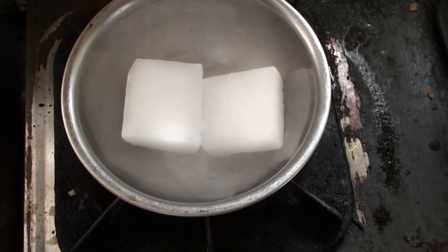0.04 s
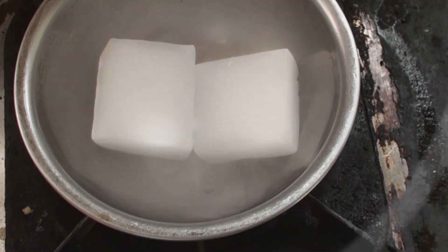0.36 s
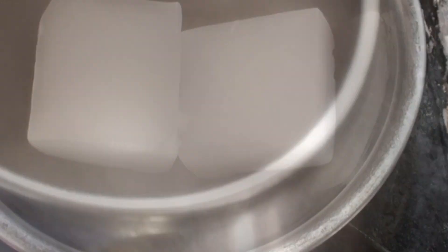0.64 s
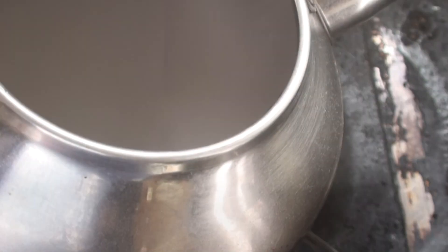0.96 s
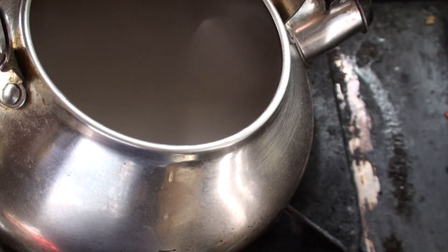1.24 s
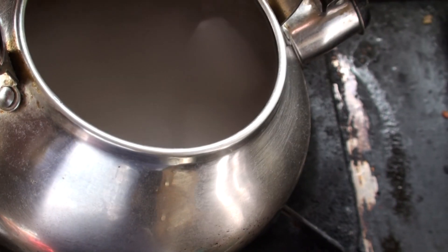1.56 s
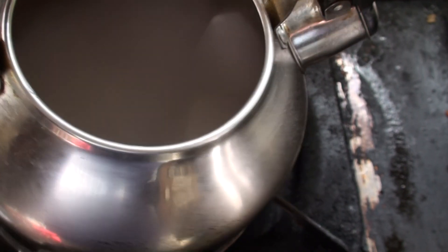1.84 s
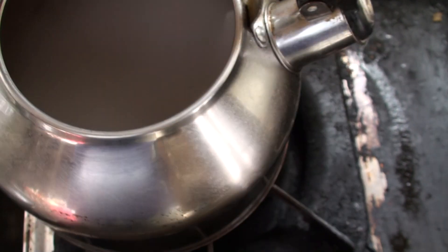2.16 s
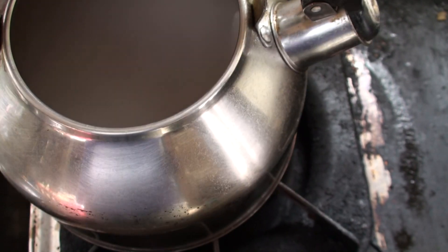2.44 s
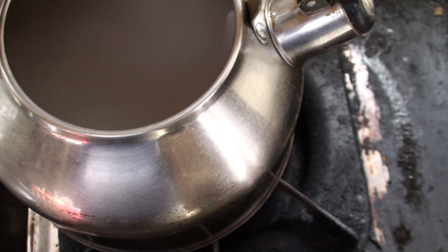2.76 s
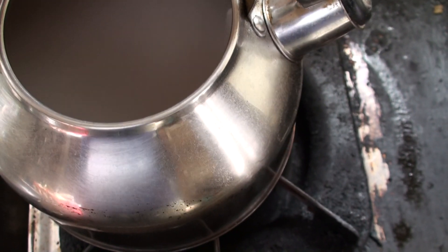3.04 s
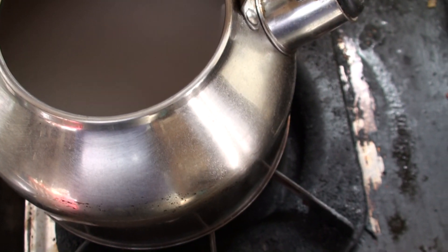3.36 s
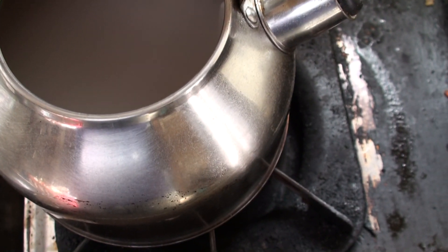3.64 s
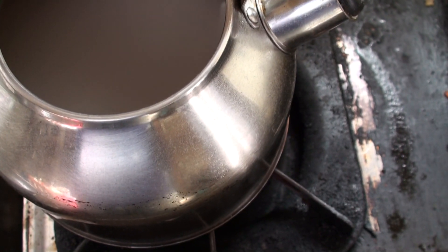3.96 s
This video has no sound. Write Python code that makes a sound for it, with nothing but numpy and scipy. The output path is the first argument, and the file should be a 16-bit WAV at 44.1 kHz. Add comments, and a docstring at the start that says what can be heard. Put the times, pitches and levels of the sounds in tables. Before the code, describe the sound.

Dry ice rattles loudly in a steel kettle, after briefly hissing and squeaking in a pan. The fast ringing chatter locks into a buzz, stalls twice and returns looser and boomier. The microphone is close, in a small kitchen.

```python
"""Dry ice on steel

A small kitchen, microphone close, pan and kettle a little to the right. Blocks of dry ice hiss and
squeak in a steel pan; then dry ice rattles loudly in a steel kettle on the stove. Escaping gas bounces
the ice on the metal hundreds of times a second, and the kettle rings. The chatter locks briefly into
a pitched buzz, stalls twice and comes back looser, with more boom."""
import sys
import numpy as np
from scipy import signal
from scipy.fft import rfft, irfft
from scipy.io import wavfile
from scipy.ndimage import uniform_filter1d, minimum_filter1d

SR = 44100
rng = np.random.default_rng(int(sys.argv[2]) if len(sys.argv) > 2 else 0)


def wav_out(sig):
    """Save sig, one row per channel (or a flat mono array), as 16-bit PCM at SR to the path in sys.argv[1]."""
    wavfile.write(sys.argv[1], SR, np.round(np.clip(np.atleast_2d(sig).T, -1, 1) * 32767).astype(np.int16))


N = 176400
TIME = np.arange(N) / SR
HZ = np.maximum(np.arange(N // 2 + 1) * SR / N, 1)

# Room tone of the kitchen: frequency_hz, level_db
ROOM_TONE_SPECTRUM = [(25, -12), (60, -14), (90, -5), (130, -11), (200, 2), (1000, -10), (15000, -32)]
# Part of the steel's ring that differs between left and right: frequency_hz, relative_db
SCATTER = [(60, 6), (200, -9), (400, -9.5), (1500, -7), (4000, -3), (12000, -0.5)]
# Where the kettle sits at the microphone: frequency_hz, left_minus_right_db
KETTLE_BALANCE = [(60, -18), (99, -5), (160, -11.5), (270, -5), (450, -7.5), (740, -6.5), (1220, -2.5),
                  (2010, -4.5), (3330, -4.5), (5500, -7.5), (9080, -1), (15000, -4.5)]

# Gas escaping under the blocks in the pan, before HISS_TRIM_DB: time_s, middle_db, treble_db
HISS_LEVELS = [(0.0, -40, -46), (0.017, -37.5, -37.5), (0.054, -39, -44.5), (0.202, -38, -33),
               (0.238, -37.5, -40), (0.482, -36, -40), (0.508, -40, -43), (0.532, -43, -52),
               (0.562, -42.5, -61), (0.578, -39, -42), (0.6, -44, -56), (0.616, -38.5, -43.5),
               (0.68, -39, -43)]
# Tone colour of that gas: frequency_hz, level_db
HISS_SPECTRUM = [(40, -41), (130, -34), (190, -10), (370, -14.5), (450, -7.5), (620, -16), (950, -2),
                 (1150, -6.5), (1550, -5), (1850, -13.5), (2300, 3), (3300, -3), (4200, -4), (5200, -8),
                 (7500, -16.5), (9500, -11), (11800, -5.5), (15500, -17)]
# Ice squeaking on the pan: start_s, length_s, pitch_hz, tone_db, rasp_db, ring_db
SQUEAKS = [(0.084, 0.01, 4300, -32, -30.5, -31), (0.134, 0.024, 4260, -20, -25, -40),
           (0.16, 0.021, 4280, -29, -24, -50), (0.178, 0.02, 3195, -16, -27, -45),
           (0.184, 0.011, 3160, -29, -14, -41), (0.197, 0.026, 4240, -19, -20.5, -39),
           (0.31, 0.011, 4300, -24.5, -44, -30.5), (0.375, 0.011, 4260, -30, -46, -44),
           (0.425, 0.036, 4290, -28, -33.5, -43), (0.441, 0.0092, 4270, -27.5, -40.5, -26.5),
           (.631, 0.012, 8660, -33, -33, -40), (0.661, 0.013, 4310, -20, -33, -31)]
# Tone colour of the rasp in a squeak: frequency_hz, level_db
RASP_SPECTRUM = [(100, -45), (800, -48), (2000, -2), (3200, 6.5), (4200, -2.5), (5200, -6), (6600, 5.5),
                 (8000, -9), (11000, -10.5), (15500, -29)]

# The kettle's main modes: pitch_hz, width_hz, tight_drive_db, loose_drive_db
KETTLE_MODES = [(201, 14.4, -13, -4), (309.6, 25, 6.5, -4), (399.6, 22, -7.5, -12), (542, 38, -7, -6),
                (730, 14.8, 6, -1), (1107.3, 28.5, 2, -1), (1526, 34, 0, -10.5), (1613, 20, -1, -11),
                (1718, 30, -4, -14.5), (2142, 75, -5, -22), (2404, 8.7, 1.5, -32), (2768, 41, -4, -34),
                (3100, 26, -5, -15), (3148, 114, -10.5, -3.5), (3560, 45, -11, 0), (3690, 59, -12, -5),
                (3936, 22, -8.5, 4), (4186, 40, -4, -6), (5190, 69, -5.5, -3.5)]
# Dense wash of weaker wall modes under tight chatter: frequency_hz, level_db
TIGHT_WASH = [(30, -43), (85, -22.5), (130, -21), (200, -12), (330, 12.5), (450, -59), (650, -40),
              (830, -4.5), (1000, -2.5), (1600, 3), (2100, -0.5), (3100, -6.5), (4500, -13.5), (6000, -11),
              (8600, -7.5), (9500, -14.5), (11500, -12.5), (13500, -25), (15500, -40)]
# The wash under loose chatter and knocks: frequency_hz, level_db
LOOSE_WASH = [(30, -50), (85, -17), (130, -18), (200, -2.5), (330, 8.5), (450, -8), (650, -17), (850, 2),
              (1150, -6.5), (1900, -8.5), (2800, -5), (3500, 2.5), (4400, -13), (5500, -5), (7500, -17),
              (9000, -26.5), (11500, -34), (15500, -52)]
# Borders between the rattle's boom, clang, treble and top: frequency_hz
CROSSOVERS_HZ = [450, 2600, 7500]
# Course of the tight rattle: time_s, boom_db, clang_db, treble_db, top_db
TIGHT_LEVELS = [(0.66, -71, -41, -45, -37), (0.682, -50, -43, -45, -51), (0.691, -6.5, -18, -13, -23),
                (0.701, 1, -13, -11, -19), (0.715, -16, -17.5, -17, -24), (0.747, -18, -23, -25, -34),
                (0.77, -9, -16.5, -18.5, -26), (0.803, -14, -20.5, -21.5, -26.5),
                (0.83, -20.5, -18, -17.5, -24), (0.92, -16.5, -14, -22, -28.5),
                (0.97, -24, -15, -18.5, -26), (1.19, -19, -14.5, -16.5, -25),
                (1.23, -29.5, -14.5, -19, -25), (1.32, -13, -14.5, -19, -27),
                (1.36, -23, -18.5, -20, -26.5), (1.6, -22.5, -15, -20, -26.5),
                (1.69, -25.5, -13.5, -20, -26.5), (1.8, -23.5, -17.5, -21.5, -29),
                (1.87, -23.5, -13.5, -19.5, -24.5), (2.07, -23, -16.5, -22.5, -30),
                (2.09, -31, -17.5, -18.5, -23), (2.221, -26.5, -15.5, -20.5, -28),
                (2.238, -14.5, -19.5, -24, -37), (2.28, -34, -27.5, -36, -43),
                (2.35, -25.5, -21, -22, -34.5), (2.38, -24, -21.5, -31.5, -49),
                (2.48, -38, -17, -19.5, -26), (2.525, -34, -16.5, -18.5, -29.5),
                (2.553, -21, -18, -21, -29.5), (2.6, -38, -29, -44, -95), (2.64, -44, -34, -49, -73),
                (2.67, -42, -43, -64, -63)]
# Course of the loose rattle: time_s, boom_db, clang_db, treble_db, top_db
LOOSE_LEVELS = [(2.67, -64, -43, -65, -64), (2.684, -30, -44, -53, -84), (2.695, -30, -30, -28, -48),
                (2.714, -34, -36, -44, -64), (2.72, -26, -36, -34, -54), (2.736, -38, -33, -23.5, -37.5),
                (2.746, -20, -24, -23, -38), (2.771, -28, -23.5, -23.5, -33), (2.779, -20, -26.5, -30, -47),
                (2.814, -22.5, -28.5, -26, -46), (2.84, -32, -39.5, -45, -73), (2.884, -40, -53, -65, -78),
                (2.918, -28, -35, -49, -65), (2.924, -28, -36, -34, -70), (2.944, -23, -30.5, -40, -57),
                (2.96, -17, -28.5, -28, -44), (3.033, -15.5, -25, -29, -44), (3.042, -10.5, -32, -41, -58),
                (3.058, -24, -31, -31, -37), (3.08, -16.5, -21, -17.5, -30.5),
                (3.144, -24, -21, -22.5, -39), (3.192, -15, -20, -17, -27), (3.24, -23.5, -24, -24.5, -37),
                (3.258, -21.5, -23, -17, -32), (3.31, -24, -19, -19, -30), (3.35, -28, -34, -37, -51),
                (3.362, -19, -24, -20, -33.5), (3.436, -26.5, -21.5, -20.5, -32.5),
                (3.488, -14, -22.5, -16.5, -31.5), (3.528, -24, -23, -22.5, -39),
                (3.55, -16.5, -19.5, -11.5, -22.5), (3.57, -22, -21, -25, -36),
                (3.6, -19.5, -23, -17.5, -34), (3.774, -16, -21.5, -18, -31.5), (3.788, -14, -23, -24, -40),
                (3.818, -19, -23, -15.5, -28.5), (3.875, -25, -23.5, -20, -34),
                (3.94, -20, -19, -14, -27.5), (4.0, -15.5, -21.5, -19.5, -35)]
# Tight chatter falling in step with one mode: middle_s, length_s, pitch_hz, over_chatter_db
SWELLS = [(0.699, 0.051, 364, -6), (0.733, 0.077, 272.4, 0.5), (0.78, .05, 294, 0), (0.798, 0.035, 372, 0),
          (0.943, 0.068, 733, -6), (1.23, 0.087, 2205, -8.5), (1.672, 0.17, 1641, -4),
          (1.87, .11, 1668, -7)]
# Bounces locking into a buzz: time_s, over_chatter_db
BUZZ_LEVELS = [(1.8, -31), (1.92, -11), (2.09, -1.5), (2.18, -8), (2.24, -13), (2.34, -8.5), (2.41, -9),
               (2.44, 11.5), (2.51, 8), (2.545, -10), (2.66, 3)]
# Bounce rate in the buzz: time_s, pitch_hz
BUZZ_PITCH = [(1.9, 557), (2.03, 562), (2.07, 578), (2.2, 579), (2.4, 588), (2.47, 579), (2.51, 580),
              (2.55, 586)]
# Harmonics of the buzz: multiple, level_db
BUZZ_HARMONICS = [(1, 1.5), (2, 7), (3, -1), (4, -6.5), (5, -13), (6, -9.5), (7, -15.5), (9, -10),
                  (10, -19), (12, -14), (14, -25), (15, -14)]
# The kettle humming under loose ice: time_s, pitch_hz, over_chatter_db
HUM = [(2.67, 324, -9), (2.77, 312.2, -1.5), (2.87, 314.6, -15), (2.93, 322.6, -2), (3.01, 312.8, 5.5),
       (3.08, 310.8, -10), (3.19, 301.3, -5), (3.28, 307.4, -16.5), (3.41, 306.4, -12.5), (3.48, 311, -9),
       (3.57, 304.2, -16.5), (3.77, 311.2, -4.5), (3.88, 316, -15), (4.0, 319.6, -3)]
# Single hard knocks of a block on the kettle: start_s, level_db
KNOCKS = [(.683, -19), (2.686, -41), (2.767, -40), (2.901, -32), (3.061, -22), (3.356, -18.5), (3.551, -14)]

TIGHT_HITS_PER_S, LOOSE_HITS_PER_S, SPITS_PER_S = 450, 260, 680  # 1 / median gap, at each corner
TIMING_SPREAD, STRENGTH_SPREAD_DB = 0.55, 1.5
TIGHT_CLUMP_DB, LOOSE_CLUMP_DB, CLUMPS_PER_S = 2.5, 1, 54
CORNER_SHIFT_DB, MODE_SHIFT_DB, SHIFTS_PER_S = 3.5, 2.5, 17  # the load wanders among corners and modes
SPUTTER_DB, SPUTTERS_PER_S, SPUTTER_ABOVE_HZ = 2.5, 270, 4200
HISS_SPLIT_HZ, HISS_TRIM_DB = 2050, 5.5
SQUEAK_WAVER, SQUEAK_OCTAVE_DB, SQUEAK_EDGE_S = 0.016, -29, 0.0025
PAN_RING_HZ, PAN_TAIL_HZ, PAN_TAIL_DB, PAN_TAIL_T60_S = 5660, 4420, -15.5, 0.24
WALL_LOW_HZ, WALL_HIGH_HZ, WALL_WIDTH_HZ = 4253, 9980, 22
WALL_DB, WALL_SHIFT_DB, WALL_SHIFTS_PER_S = -5, 5, 43
BUZZ_JITTER, BUZZ_LOOSE_JITTER = 0.0038, 0.0049  # share of the pitch; extra while the chatter wins


def from_db(db):
    """Decibels to gain."""
    return 10 ** (np.asarray(db) / 20)


def rms_one(x):
    """Scale to unit rms."""
    return x / np.sqrt(np.mean(x ** 2) + 1e-20)


def in_time(rows):
    """Each column of a time table at every sample."""
    times, *columns = np.transpose(rows)
    return [np.interp(TIME, times, column) for column in columns]


def at_hz(points):
    """A spectrum table at every frequency."""
    hz, db = np.transpose(points)
    return np.interp(np.log(HZ), np.log(hz), db)


def colour(x, points):
    """Shape a sound by a spectrum table."""
    return irfft(rfft(x) * from_db(at_hz(points)), N)


def drift(rate_hz):
    """Random wander of unit rms, mostly slower than rate_hz."""
    return rms_one(irfft(rfft(rng.standard_normal(N)) / (1 + (HZ / rate_hz) ** 2), N))


def sides(db):
    """Left and right gains for a level difference; their mean is 1."""
    left = 2 / (1 + from_db(-np.atleast_1d(db)))
    return np.array([left, 2 - left])


def through(x, response):
    """Play a sound through an impulse response."""
    return signal.fftconvolve(np.atleast_2d(x), response[:, :SR // 2], axes=1)[:, :N]


def follow(x, levels, crossovers, even_s=0.033):
    """Even out each band, then give it its level curve; silent outside the curve."""
    out, rest = 0, rfft(x)
    size = int(even_s * SR)
    for hz, level_db in zip([*crossovers, SR], in_time(levels)):
        part = rest / (1 + (HZ / hz) ** 16)
        rest = rest - part
        band = irfft(part, N)
        power = uniform_filter1d(uniform_filter1d(band.mean(0) ** 2, size), size // 2)
        out = out + band / np.sqrt(np.abs(power) + 1e-18) * from_db(level_db)
    sounding = (TIME >= levels[0][0]) & (TIME <= levels[-1][0])
    return out * uniform_filter1d(1.0 * sounding, size=200)


def room_tone(level_db=-52):
    """The quiet of the kitchen: faint, steady, dull noise."""
    return from_db(level_db) * rms_one(colour(rng.standard_normal((2, N)), ROOM_TONE_SPECTRUM))


def kitchen_reverb(x, t60_s=0.21, level_db=-12.5):
    """Near walls return a short diffuse tail, different on each side of the microphone."""
    tail = rng.standard_normal((2, N)) * from_db(-60 * TIME / t60_s) * (TIME > .005)
    tail /= np.sqrt(np.sum(tail ** 2, axis=1, keepdims=True))
    return from_db(level_db) * through(x, tail)


def contacts(per_s, clump_db):
    """Ice tapping steel: unevenly timed clicks whose strength comes in clumps."""
    timing, strength = rng.standard_normal((16000, 2)).T
    at = (np.cumsum(np.exp(TIMING_SPREAD * timing)) / per_s * SR).astype(int)
    clicks = np.bincount(at[at < N], from_db(STRENGTH_SPREAD_DB * strength[at < N]), N)
    return (clicks - clicks.mean()) * from_db(clump_db * drift(CLUMPS_PER_S))


def wash(t60_s):
    """The dying ring of countless close modes, partly different left and right."""
    dying = rng.standard_normal((3, N)) * from_db(-60 * np.minimum(TIME / t60_s, 4))
    dying /= np.sqrt(np.sum(dying ** 2, axis=1, keepdims=True))
    return dying[0] + colour(dying[1:], SCATTER)


def corners(per_s, clump_db, spectrum, t60_s, count):
    """The ice touches at several corners, each with its own wash; returns the clicks and their wash."""
    trains = [contacts(per_s, clump_db) * from_db(CORNER_SHIFT_DB * drift(SHIFTS_PER_S))
              for _ in range(count)]
    ringing = sum(through(clicks, wash(t60_s)) for clicks in trains)
    return sum(trains), colour(ringing, spectrum)


def sputter(x):
    """Soft and hard contacts alternate at random, so the treble flares and dulls."""
    low = irfft(rfft(x) / (1 + (HZ / SPUTTER_ABOVE_HZ) ** 4), N)
    return low + (x - low) * from_db(SPUTTER_DB * drift(SPUTTERS_PER_S))


def pan_hiss():
    """Gas spits from under the blocks in a dense sizzle."""
    _, spits = corners(SPITS_PER_S, clump_db=5.2, spectrum=HISS_SPECTRUM, t60_s=0.038, count=4)
    return from_db(HISS_TRIM_DB) * follow(sputter(spits), HISS_LEVELS, [HISS_SPLIT_HZ])


def pan_squeaks():
    """Ice squeals on the pan with a rasp of fast contacts and a high ring; one mode sings on faintly."""
    scraping = through(contacts(per_s=1800, clump_db=3.5), wash(t60_s=0.011))
    rasp = rms_one(colour(scraping, RASP_SPECTRUM))
    phase_per_hz = 2 * np.pi * np.cumsum(1 + SQUEAK_WAVER * drift(315)) / SR
    ring = np.sin(2 * np.pi * PAN_RING_HZ * TIME)
    age = TIME[:SR // 2]
    tail = from_db(PAN_TAIL_DB - 60 * age / PAN_TAIL_T60_S) * np.sin(2 * np.pi * PAN_TAIL_HZ * age)
    out = np.zeros((2, N))
    for start_s, length_s, hz, tone_db, rasp_db, ring_db in SQUEAKS:
        inside_s = np.minimum(TIME - start_s, start_s + length_s - TIME)
        gate = np.clip(inside_s / SQUEAK_EDGE_S + .5, 0, 1)
        on = gate > 0
        phase = hz * phase_per_hz[on]
        tone = np.sin(phase) + from_db(SQUEAK_OCTAVE_DB) * np.sin(2 * phase)
        squeak = from_db(tone_db) * tone + from_db(rasp_db) * rasp[:, on] + from_db(ring_db) * ring[on]
        out[:, on] += gate[on] * squeak
        middle = int((start_s + length_s / 2) * SR)
        out[:, middle:middle + len(tail)] += from_db(tone_db) * tail
    return out


def thin_wall(x, groups=5, per_group=9):
    """Narrow high modes of the thin steel flare and fade in groups as the contacts move."""
    out, spectrum = x, rfft(x)
    modes_hz = np.sort(rng.uniform(WALL_LOW_HZ, WALL_HIGH_HZ, groups * per_group))
    for group in modes_hz.reshape(groups, per_group):
        peaks = sum(1 / (1 + 2j * (HZ - hz) / WALL_WIDTH_HZ) for hz in group)
        flare = from_db(WALL_DB + WALL_SHIFT_DB * drift(WALL_SHIFTS_PER_S))
        out = out + irfft(spectrum * peaks, N) * flare
    return out


def swells(waver_hz=6):
    """A mode that the bounces keep in step with sings out briefly over the chatter."""
    out = np.zeros(N)
    waver = waver_hz * drift(60)
    for middle_s, length_s, hz, db in SWELLS:
        on = np.abs(TIME - middle_s) < length_s / 2
        arch = np.cos(np.pi * (TIME[on] - middle_s) / length_s)
        phase = 2 * np.pi * np.cumsum(hz + waver[on]) / SR
        out[on] += np.sqrt(2) * from_db(db) * arch * np.sin(phase)
    return out


def hum(jitter=0.01462):
    """Looser ice rocks in step with the lowest strong mode and drives it into a nearly steady tone."""
    hz, db = in_time(HUM)
    phase = 2 * np.pi * np.cumsum(hz * (1 + jitter * drift(41.7))) / SR
    return np.sqrt(2) * from_db(db) * np.sin(phase)


def buzz(flutter_db=2):
    """Regular bounces make a stack of harmonics, rough at first and purer the more firmly they lock."""
    (hz,), (db,) = in_time(BUZZ_PITCH), in_time(BUZZ_LEVELS)
    jitter = BUZZ_JITTER + BUZZ_LOOSE_JITTER / (1 + from_db(db) ** 2)
    phase = 2 * np.pi * np.cumsum(hz * (1 + jitter * drift(151))) / SR
    stack = 0
    for multiple, level_db in BUZZ_HARMONICS:
        gain = from_db(level_db + flutter_db * drift(16))
        stack = stack + gain * np.cos(multiple * phase + rng.uniform(0, np.pi))
    return rms_one(stack) * from_db(db) * (TIME > BUZZ_LEVELS[0][0])


def knocks(t60_s=0.052, low_cut_hz=790):
    """A block drops back on the steel: a sharp clack that rings the wall."""
    clicks = np.zeros(N)
    for start_s, db in KNOCKS:
        clicks[int(start_s * SR)] = from_db(db)
    clacks = colour(through(clicks, wash(t60_s)), LOOSE_WASH)
    clacks = signal.sosfilt(signal.butter(2, low_cut_hz, "high", fs=SR, output="sos"), clacks)
    energy = np.sum(clicks ** 2) * t60_s * SR / np.log(1000)  # each clack starts near its level_db
    return clacks * np.sqrt(energy / np.sum(clacks ** 2))


def chatter(per_s, clump_db, drives_db, spectrum, wash_db):
    """Ice bouncing on its own gas rings the kettle's main modes and the wash between them."""
    clicks, dense_ring = corners(per_s, clump_db, spectrum, t60_s=0.096, count=2)
    modes = 0
    for k, ((hz, width_hz, *_), db) in enumerate(zip(KETTLE_MODES, drives_db)):
        polarity = (-1) ** (k // 2)
        drive = polarity * clicks * from_db(db + MODE_SHIFT_DB * drift(SHIFTS_PER_S))
        radius = np.exp(-np.pi * width_hz / SR)
        feedback = [1, -2 * radius * np.cos(2 * np.pi * hz / SR), radius ** 2]
        modes = modes + signal.lfilter([1 - radius, 0, radius - 1], feedback, drive)
    modes = signal.sosfilt(signal.butter(2, [220, 6500], "band", fs=SR, output="sos"), modes)
    return rms_one(modes + from_db(wash_db) * thin_wall(dense_ring))


def kettle_rattle():
    """Tight chatter that turns into a buzz, then looser, humming bouts, with a few hard knocks."""
    _, _, tight_db, loose_db = np.transpose(KETTLE_MODES)
    tight = chatter(TIGHT_HITS_PER_S, TIGHT_CLUMP_DB, tight_db, TIGHT_WASH, wash_db=-9)
    tight = follow(tight + buzz() + swells(), TIGHT_LEVELS, CROSSOVERS_HZ)
    loose = chatter(LOOSE_HITS_PER_S, LOOSE_CLUMP_DB, loose_db, LOOSE_WASH, wash_db=-11)
    loose = follow(sputter(loose + hum()), LOOSE_LEVELS, CROSSOVERS_HZ)
    rattle = tight + loose + knocks()
    return irfft(rfft(rattle) * sides(at_hz(KETTLE_BALANCE)), N)


def scene():
    """Pan and kettle close to the microphone, a little to the right, over the quiet of the kitchen."""
    near = kettle_rattle() + (pan_hiss() + pan_squeaks()) * sides(db=-5)
    return near + kitchen_reverb(near) + room_tone()


def record(dry):
    """The recorder cuts the very top, and a fast limiter holds the peaks."""
    stopband_hz, ceiling, limiter_s = 16500, 0.86, 0.0053
    x = signal.sosfilt(signal.cheby2(12, 70, stopband_hz, fs=SR, output="sos"), dry)
    size = int(limiter_s * SR)
    gain = minimum_filter1d(ceiling / np.maximum(np.abs(x).max(0), ceiling), size)
    return x * uniform_filter1d(gain, size)


dry = scene()
out = record(dry)
wav_out(out)
```